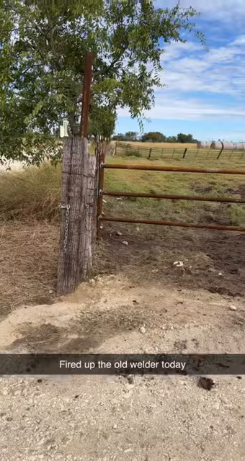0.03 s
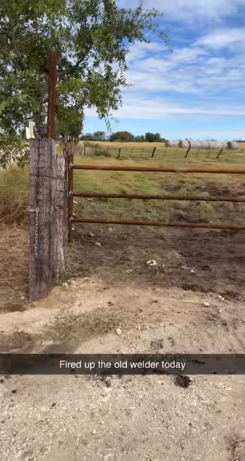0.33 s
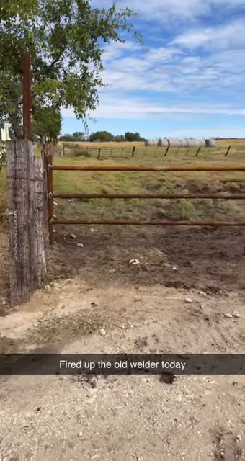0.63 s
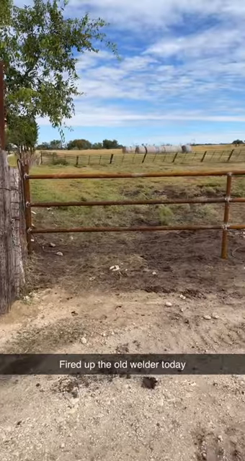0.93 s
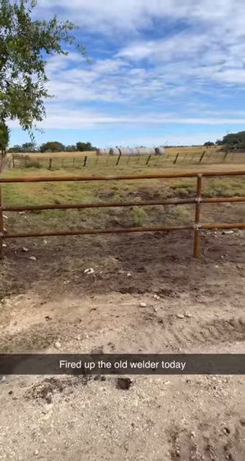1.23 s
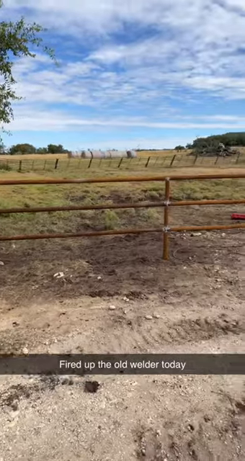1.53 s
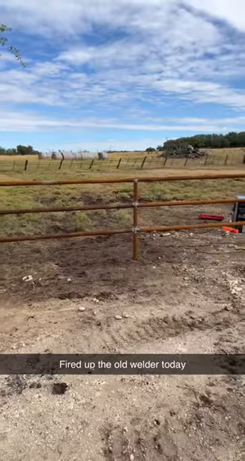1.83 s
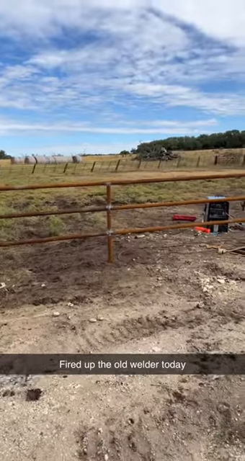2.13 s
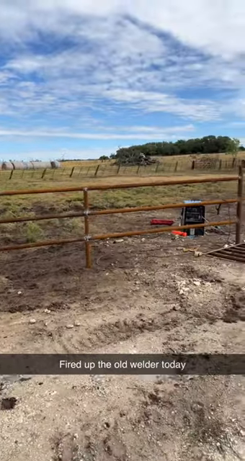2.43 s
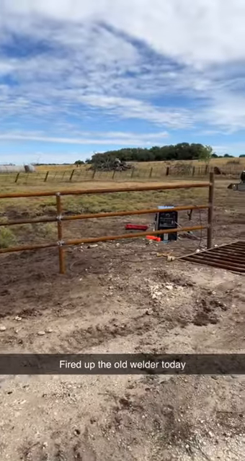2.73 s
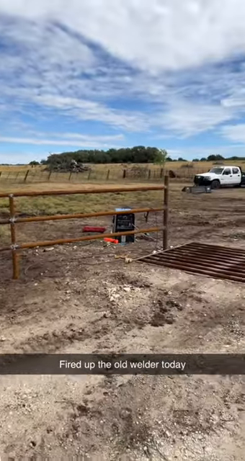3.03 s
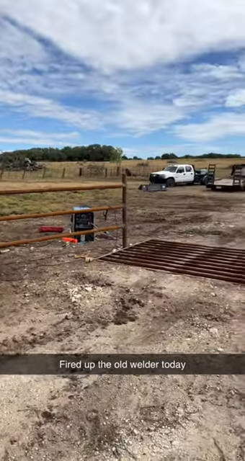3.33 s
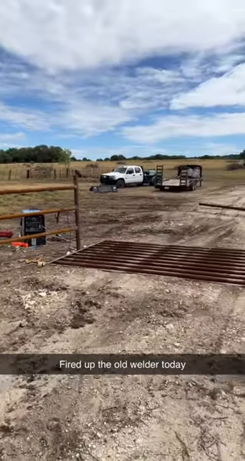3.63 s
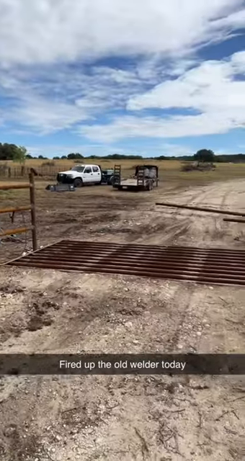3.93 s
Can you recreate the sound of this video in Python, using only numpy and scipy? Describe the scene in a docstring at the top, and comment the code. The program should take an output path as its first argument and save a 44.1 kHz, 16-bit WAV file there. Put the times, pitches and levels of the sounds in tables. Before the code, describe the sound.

After silence, the drone of an engine-driven welder cuts in abruptly at about 0.3 seconds and runs steadily outdoors until the end at 4 seconds. Fast exhaust chuffs and a slowly weakening low hum sit under rushing air and light valve clatter. A thin, high squeal wavers throughout, strongest around 0.8 and 2.6 seconds. The rush gently shifts in tone as the microphone moves past.

```python
"""After a short silence, the drone of an engine-driven welder cuts in, outdoors, at about 3600 rpm.
Pressure pulses from the crank make the drone, and gas puffs chuff through the muffler above a low hum.
Cooling air and valve clatter rush over it, and a thin squeal wavers on top. As a phone is carried
slowly past, a reflection off the dirt interferes with the rush and sweeps through it."""
import sys
import numpy as np
from scipy import signal
from scipy.fft import rfft, irfft
from scipy.io import wavfile
from scipy.ndimage import uniform_filter1d, map_coordinates

SR = 44100
rng = np.random.default_rng(int(sys.argv[2]) if len(sys.argv) > 2 else 0)


def master_out(mix):
    """Clip the mix to full scale and print it as 16-bit PCM to the path in sys.argv[1]."""
    frames = np.transpose(np.atleast_2d(mix))
    ceiling = np.clip(frames, -1, 1)
    pcm = np.round(ceiling * 32767).astype(np.int16)
    wavfile.write(sys.argv[1], SR, pcm)


N = 176400

# Sinking hum (time [s], frequency [Hz], level [dB])
HUM_TRACK = [(.3, 78.8, -26), (2.0, 77.4, -28.5), (4.0, 77, -33.5)]
# Squeal pitch, sagging as the contact grips harder (time [s], frequency [Hz])
SQUEAL_PITCH = [(.45,2955),(.6,2930),(.68,2948),(.78,2948),(.88,2872),(.98,2932),(1.12,2925),(1.25,2952),(1.37,2950),(1.49,2885),(1.63,2940),(1.92,2975),(2.05,2920),(2.15,2948),(2.24,2940),(2.4,2973),(2.52,2975),(2.63,2930),(2.73,2952),(2.83,2945),(2.98,2973),(3.1,2960),(3.2,2927),(3.42,2935),(3.56,2962),(3.8,2932)]
# Squeal fundamental (time [s], relative level [dB])
SQUEAL_LEVEL = [(.35,-40.5),(.6,-33),(.76,-30.5),(.81,-21.5),(.93,-34.5),(1.07,-28.5),(1.25,-38.5),(1.4,-29.5),(1.55,-35),(1.9,-41),(2.0,-29),(2.11,-34.5),(2.21,-25.5),(2.33,-29),(2.5,-31.5),(2.57,-20),(2.68,-32),(2.78,-24),(2.89,-33),(3.12,-24.5),(3.25,-32),(3.37,-30),(3.7,-38),(4,-34.5)]
# Upper partials of the squeal (frequency ratio [1], level [dB])
SQUEAL_PARTIALS = [(1.916, -45.5), (1.997, -45)]
# Spectrum of air and clatter (frequency [Hz], relative density [dB])
RUSH_SPECTRUM = [(400,-6.5),(520,-9),(730,-1),(850,-2.5),(1130,-9),(1490,-4.5),(1800,-7),(2000,-4.5),(2400,-1.5),(2800,-3),(3050,-9),(3280,-8),(3550,-15),(3950,-14.5),(4450,-10),(5100,-14),(5800,-13),(7700,-15.5),(8600,-19.5),(9200,-20.5),(10400,-26.5),(12000,-25),(15500,-20)]
# Bands of the rush (centre frequency [Hz])
RUSH_BANDS_HZ = [600, 1400, 2500, 5000, 8000, 14000]
# Shading of the rush as the phone turns (time [s], gain in each of the six bands [dB])
RUSH_BAND_GAINS = [(.3, -0.83, 0.5, 1.3, -5, 0.5, -0.51), (.9, 0, 0.5, 1.6, -4, 2.5, -1.2),
                   (1.5, 0, 1, 0.9, -3.5, 3, 0.41), (2.0, -0.17, 0.5, -0.04, 0, 2.5, 0.5),
                   (2.6, 0.21, -1, -1.7, 0, 1.5, -3.1), (3.2, -0.21, -2, -2.4, 0, -1, -1.3),
                   (4.0, 0.29, -4.5, -1.9, -0.5, -4.5, 0.99)]
# Ground reflection (time [s], delay [ms])
GROUND_DELAY = [(.35, .6), (.8, .71), (1.3, .79), (1.85, .88), (2.55, 1.03), (3.25, 1.08), (3.9, 1.21)]
# Muffler response (frequency [Hz], relative gain [dB])
MUFFLER_RESPONSE = [(25, -13), (55, -11), (90, 0), (140, 1.5), (250, 3.5), (350, 6.5), (420, -3),
                    (520, -12), (800, -7), (1500, -31.5)]
# The four strokes (position [cycles], relative level [dB])
STROKES = [(.76, -5.5), (.05, -4.5), (.25, 2), (.51, -4)]
# Drone harmonics (multiple of the cycle rate [1], relative level [dB])
DRONE_HARMONICS = [(2, -21.5), (3, -69), (4, -25), (5, -37), (6, -28.5), (7, -42.5), (8, -35.5), (9, -72),
                   (10, -43.5), (12, -38), (13, -56), (16, -44), (18, -42.5), (24, -34.5), (27, -48),
                   (48, -47), (65, -44)]

CYCLE_HZ, CYCLE_ORIGIN_S = 30.129, .0229  # one four-stroke cycle is two crank turns
START_S = .3037


def undb(db):
    """Amplitude ratio from decibels."""
    return 10 ** (np.asarray(db) / 20)


def level(x, db):
    """Normalisation to an rms level."""
    return x * undb(db) / np.sqrt(np.mean(x ** 2))


def curve(table, column=1):
    """Linear interpolation of a time table at every sample."""
    rows = np.array(table, float)
    return np.interp(np.arange(N) / SR, rows[:, 0], rows[:, column])


def wander(rate_hz):
    """Low-pass noise: smoothed random steps with unit standard deviation."""
    hold = max(int(SR / rate_hz), 2)
    steps = np.repeat(rng.standard_normal(N // hold + 1), hold)
    smooth = uniform_filter1d(uniform_filter1d(steps, hold), hold)[:N]
    return smooth / smooth.std()


def over_bins(hz, values):
    """Interpolation in log frequency at every spectral bin."""
    bin_hz = np.maximum(np.arange(N // 2 + 1) * SR / N, 1)
    return np.interp(np.log(bin_hz), np.log(hz), values)


def colour(x, response):
    """Zero-phase filtering by (frequency [Hz], gain [dB]) points."""
    hz, db = np.array(response, float).T
    return irfft(rfft(x) * undb(over_bins(hz, db)), N)


def bursts(cycle, decay_s, scatter_db):
    """Impulsive excitation: each stroke starts an exponentially decaying burst of noise."""
    hits = np.zeros(N)
    whole_cycles = np.arange(np.ceil(cycle[0]), np.floor(cycle[-1]))
    for position, db in STROKES:
        at = np.minimum(np.searchsorted(cycle, whole_cycles + position), N - 1)
        hits[at] += undb(db + scatter_db * rng.standard_normal(len(at)))
    envelope = signal.lfilter([1], [1, -np.exp(-1 / (decay_s * SR))], hits)
    return level(envelope, 0) * rng.standard_normal(N)


def hum():
    """Beating: a low tone, out of step with the crank, interferes with the drone."""
    phase = 2 * np.pi * np.cumsum(curve(HUM_TRACK)) / SR
    return np.sqrt(2) * undb(curve(HUM_TRACK, column=2)) * np.sin(phase)


def squeal(jitter_hz=4, flicker_db=2, roughness=.14):
    """Friction-excited vibration, perhaps of a dry bearing: a thin tone with two faint partials."""
    pitch_hz = curve(SQUEAL_PITCH) + jitter_hz * wander(150)
    phase = 2 * np.pi * np.cumsum(pitch_hz) / SR
    tone = undb(curve(SQUEAL_LEVEL) - .26) * np.sin(phase)
    for ratio, db in SQUEAL_PARTIALS:
        tone += undb(db + flicker_db * wander(6.9)) * np.sin(ratio * phase)
    return np.sqrt(2) * tone * (1 + roughness * wander(120))


def rush(cycle, clatter_db=-11.5, low_cut_hz=376):
    """Broadband noise of cooling air and valve impacts; its colour shifts as the phone turns."""
    air = rng.standard_normal(N) * undb(.45 * wander(300))
    clatter = undb(clatter_db) * bursts(cycle, decay_s=.0023, scatter_db=2.5)
    highpass = signal.butter(2, low_cut_hz, "high", fs=SR, output="sos")
    noise = signal.sosfilt(highpass, colour(air + clatter, RUSH_SPECTRUM))
    spectrum = rfft(level(noise, -23.5))
    out = np.zeros(N)
    for column, weights in enumerate(np.eye(len(RUSH_BANDS_HZ)), start=1):
        band = irfft(spectrum * over_bins(RUSH_BANDS_HZ, weights), N)
        out += band * undb(curve(RUSH_BAND_GAINS, column))
    return out


def ripple(x, ripple_db=1.3, spacing_hz=45, full_ripple_hz=1500):
    """Colouration: a fine, fixed, random ripple in the spectrum makes the rush ring faintly."""
    bin_hz = np.arange(N // 2 + 1) * SR / N
    knots_hz = np.arange(0, SR / 2, spacing_hz)
    db = ripple_db * rng.standard_normal(len(knots_hz)) * np.minimum(knots_hz / full_ripple_hz, 1)
    return irfft(rfft(x) * undb(np.interp(bin_hz, knots_hz, db)), N)


def ground(x, gain=.45, band_hz=(1950, 6500)):
    """Comb filtering: direct sound interferes with its ever later reflection off the dirt."""
    bandpass = signal.butter(1, band_hz, "band", fs=SR, output="sos")
    reflected = signal.sosfilt(bandpass, x)
    delayed_index = np.arange(N) - curve(GROUND_DELAY) * SR / 1000
    return x + gain * map_coordinates(reflected, [delayed_index], mode="mirror")


def chuffs(cycle):
    """Source and filter: the muffler colours a puff of gas at each stroke."""
    puffs = bursts(cycle, decay_s=.0057, scatter_db=1.2)
    return level(colour(puffs, MUFFLER_RESPONSE), -31)


def drone(cycle, firing_lag_cycles=.42, dispersion_rad=.08, flutter_db=.5, gain_db=-1):
    """Harmonic series: pressure pulses once a crank turn; firing every other turn adds odd lines."""
    out = np.zeros(N)
    for k, db in DRONE_HARMONICS:
        phase = 2 * np.pi * k * (cycle - firing_lag_cycles * (k % 2))
        phase += dispersion_rad * k ** 2  # the muffler delays lows relative to highs
        out -= np.sqrt(2) * undb(db + flutter_db * wander(25.17)) * np.sin(phase)
    return out * undb(gain_db)


def scene():
    """Superposition in two identical channels; one crank times the drone, chuffs and clatter."""
    cycle = CYCLE_HZ * (np.arange(N) / SR - CYCLE_ORIGIN_S) + .003 * wander(6)
    mono = drone(cycle) + hum() + chuffs(cycle) + ground(ripple(rush(cycle))) + squeal()
    return np.array([mono, mono])


def record(dry):
    """Gating and band limiting: the phone cuts in abruptly and drops the highest treble."""
    live = np.arange(N) / SR >= START_S
    lowpass = signal.ellip(14, .2, 80, 15750, fs=SR, output="sos")
    return signal.sosfilt(lowpass, dry * live)


dry = scene()
out = record(dry)
master_out(out)
```